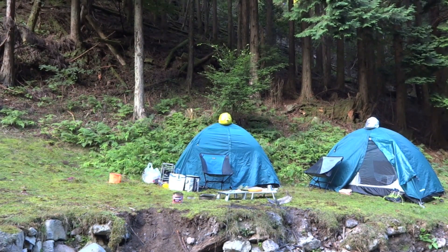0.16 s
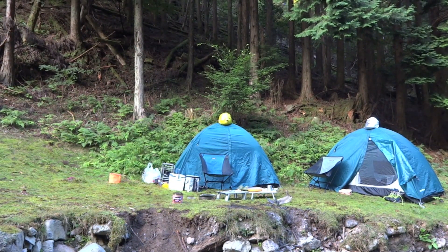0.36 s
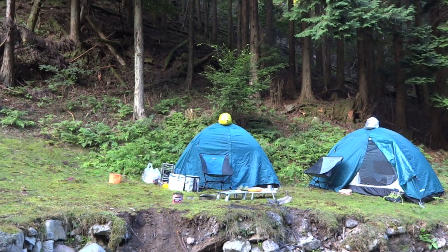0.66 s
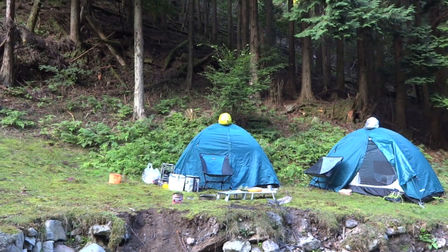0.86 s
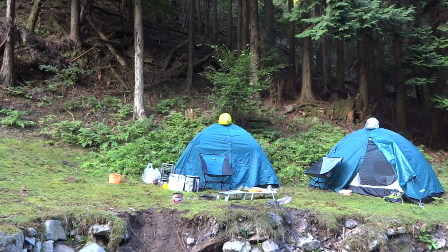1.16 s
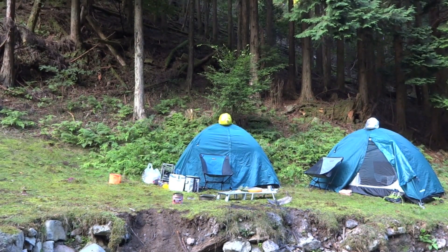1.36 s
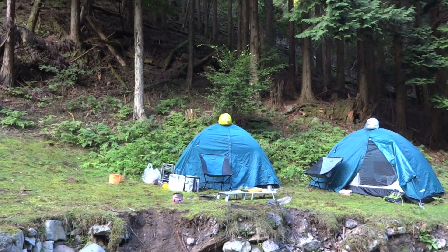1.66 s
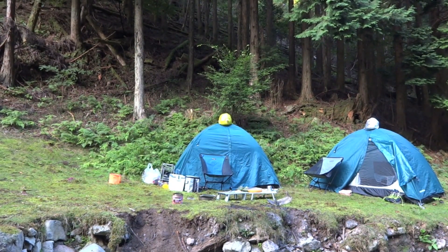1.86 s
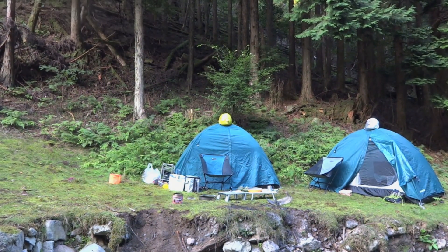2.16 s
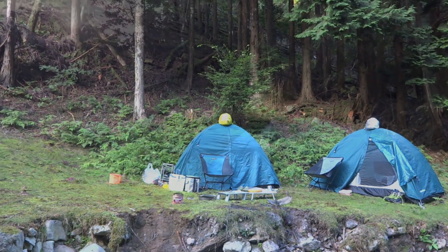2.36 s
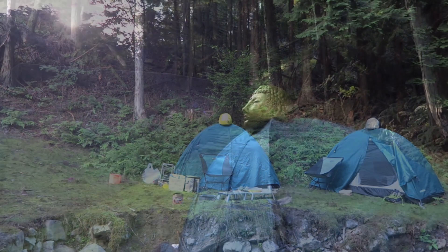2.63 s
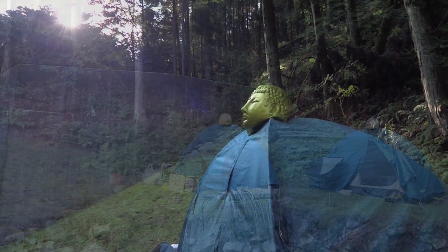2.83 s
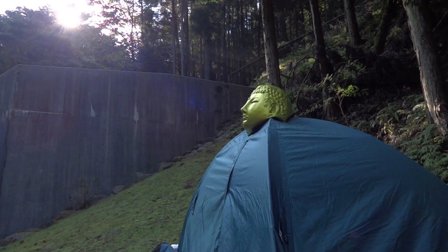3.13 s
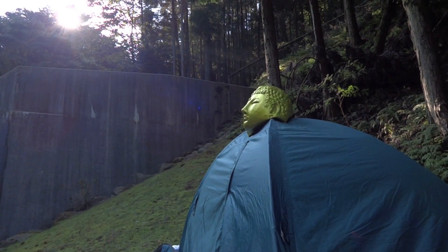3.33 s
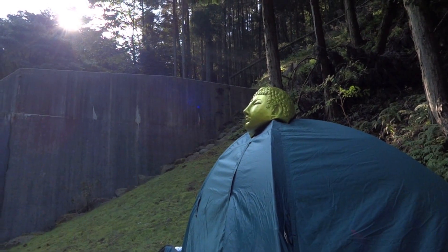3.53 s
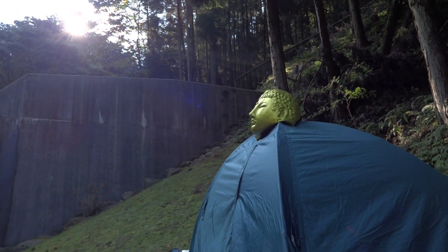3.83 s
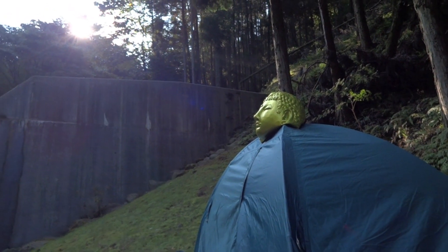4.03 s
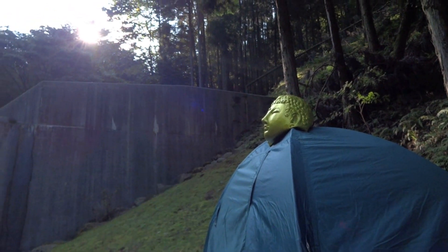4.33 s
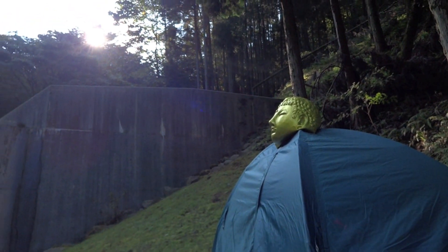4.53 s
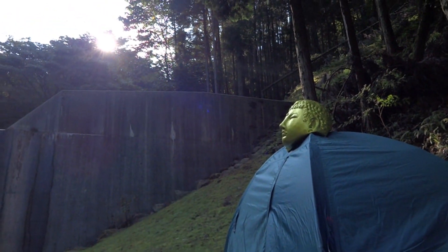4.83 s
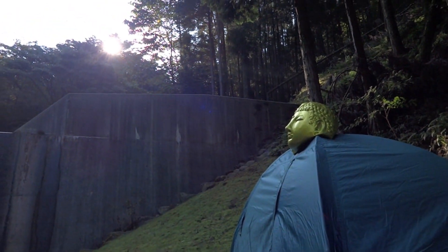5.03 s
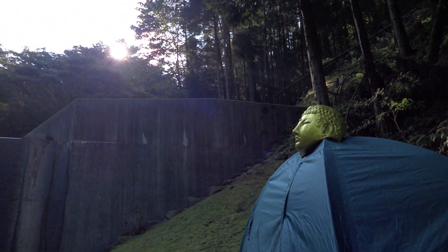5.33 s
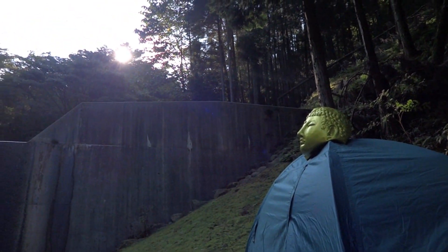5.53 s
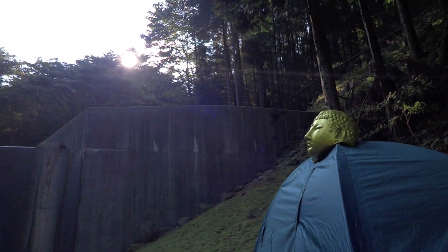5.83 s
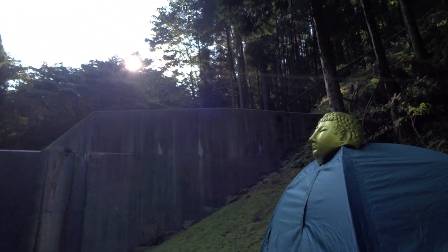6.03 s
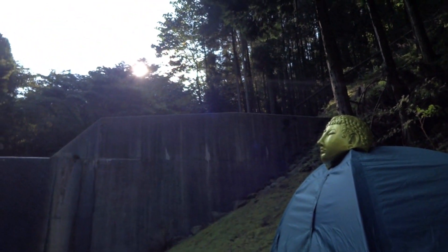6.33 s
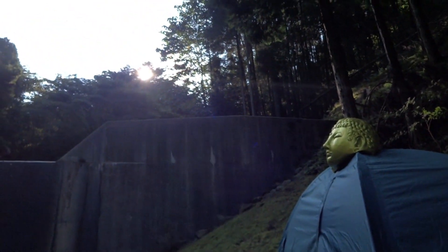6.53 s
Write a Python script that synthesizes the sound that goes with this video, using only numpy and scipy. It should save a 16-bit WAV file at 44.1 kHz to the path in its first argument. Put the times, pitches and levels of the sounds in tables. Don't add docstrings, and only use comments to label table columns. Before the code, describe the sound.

Shallow water tumbles over rocks outdoors, close and lively, with hollow bubbles, sharp drips, brief high chirps and a small rising run of low plops just before two seconds. The sound then blends smoothly into the same water at a distance, softer and flatter, with a few faint bubbles. The small stereo microphone gives little bass and leans left; the rush is continuous to the end.

```python
import sys
import numpy as np
from scipy import signal
from scipy.fft import rfft, irfft
from scipy.io import wavfile
from scipy.ndimage import uniform_filter1d

SR = 44100
rng = np.random.default_rng(int(sys.argv[2]) if len(sys.argv) > 2 else 0)


def master(y):
    cut = np.clip(np.atleast_2d(y).T, -1, 1)
    pcm = np.round(cut * 32767)
    wavfile.write(sys.argv[1], SR, pcm.astype(np.int16))


def boost(x):
    u = np.asarray(x, float) / 20
    return 10 ** u


N = 294588


def evened(x):
    return x / np.sqrt(np.mean(x ** 2) + 1e-20)


def ramp(span, t):
    return np.clip((t - span[0]) / (span[1] - span[0]), 0, 1)


def read(points, hz):
    f, *columns = np.transpose(points)
    return [np.interp(np.log(hz + 1), np.log(f + 1), column) for column in columns]


def patchwork(shape, bands, frames):
    chance = rng.standard_normal(shape)
    across = uniform_filter1d(chance, size=bands, axis=0)
    return evened(uniform_filter1d(across, size=frames, axis=1))


def bubble(hz, cycles, rise, soft):
    u = np.arange(3000) * hz / (SR * cycles)
    shape = (1 - np.exp(-u / soft)) * np.exp(-3.0 * u)
    return shape / shape.max() * np.sin(2 * np.pi * cycles * (u + rise * u ** 2 / 2))


def plops(rows, trim_db, cycles, rise, soft=0.073):
    out = np.zeros(N + 3000)
    for s, db, hz in rows:
        start = round(s * SR)
        out[start:start + 3000] += boost(db + trim_db) * bubble(hz, cycles, rise, soft)
    return out[:N]


def gurgle():
    per_s, spread_db, low_hz, high_hz, count = 900, 2.5, 452.0, 6010, 30
    out = np.zeros(N)
    bursts = rng.random(N) < per_s / SR
    strength = bursts * boost(spread_db * np.minimum(rng.exponential(1, N), 3))
    size = rng.integers(0, count, N)
    for k, hz in enumerate(np.geomspace(low_hz, high_hz, count)):
        ring = bubble(hz, cycles=26.0, rise=0.05, soft=0.58)
        ring *= np.sqrt(hz) / np.linalg.norm(ring)
        out += signal.oaconvolve(strength * (size == k), ring)[:N]
    return evened(out) * np.sqrt(2 * (high_hz - low_hz) / SR)


def place(rush, hollows, ports, level_db, bright_db, gurgles, gurgle_share, patchy_db, splash_db, lumpy_db):
    stft = {"fs": SR, "nperseg": 512, "noverlap": 384}
    hz, t, fizz = signal.stft(rng.standard_normal((2, N)), **stft)
    rings = signal.stft(gurgles, **stft)[2]
    share = gurgle_share * ((hz > 450) & (hz < 6000))[:, None]
    z = np.sqrt(1 - share) * fizz + np.sqrt(share) * rings
    shape = len(hz), len(t)
    churn_db = patchy_db * patchwork(shape, 9, 14) + splash_db * patchwork(shape, 75, 7)
    heave_db = lumpy_db * patchwork(shape, 2, 40)
    churned = np.clip(np.log2(hz / 200 + 1e-9) / 2, 0, 1)[:, None]
    tilt_db = bright_db * np.log2((hz[:, None] + 300) / 2500)
    z = z * boost(churned * churn_db + (1 - churned) * heave_db + tilt_db)
    water = rfft(signal.istft(z, **stft)[1][:, :N])

    hz = np.fft.rfftfreq(N, 1 / SR)
    colour_db = read(rush, hz)[0]
    for f, width, lift_db in hollows:
        colour_db = colour_db + lift_db / (1 + (2 * (hz - f) / width) ** 2)
    lean_db, like, lead = read(ports, hz)
    right = like * np.exp(1j * lead) * water[0] + np.sqrt(1 - like ** 2) * water[1]
    pair = irfft(boost(colour_db) * np.array([water[0], right * boost(-lean_db)]), N)
    return pair / pair.mean(0).std() * boost(level_db)


def near_bank(gurgles):
    # (frequency [Hz], level [dB per Hz])
    rush = [(30, -36), (120, -36), (220, -25), (390, -12.5), (560, -5), (820, 1.5), (1350, -2),
            (2000, -2.5), (2800, -4), (4700, -7.5), (7000, -7), (10000, -14.5), (13000, -22.5),
            (15500, -23)]
    # (frequency [Hz], width [Hz], lift [dB])
    hollows = [(846, 63, -1.5), (532, 28, 4.5), (1580, 250, 5), (2300, 400, 1), (3500, 470, 4),
               (4010, 450, 4), (5300, 380, 3), (380, 42, 5), (650, 54, -2.5), (8560, 300, 2)]
    # (frequency [Hz], left over right [dB], coherence [0-1], phase lead [rad])
    ports = [(60, 1.2, 0.27, -0.1), (400, 1.4, 0.86, 0.2), (1000, 1.8, 0.95, 0.1), (1300, 2.4, 0.71, -0.1),
             (1600, 5.5, 0.26, 0.4), (2200, 3.0, 0.86, 0.2), (2900, 5.6, 0.64, 0.3), (3800, 4.5, 0.97, 0.0),
             (4700, 5.5, 0.81, 0.1), (5500, 4.7, 0.97, 0.0), (7400, 6.9, 0.95, 0.0), (8500, 5.4, 0.84, 0.0),
             (11000, 4.6, 0.38, 0.2), (13500, 1.0, 0.55, 0.0)]
    return place(rush, hollows, ports, -36.5, 0.33, gurgles, gurgle_share=0.14,
                 patchy_db=0.3, splash_db=1.04, lumpy_db=2.0)


def hollow_bubbles():
    # (time [s], peak level [dB], pitch [Hz])
    lingering = [(0.002, -31, 847), (0.04, -45, 830), (0.335, -38, 880), (0.36, -41, 870),
                 (0.029, -37, 1020), (0.184, -35.5, 800), (0.29, -30.5, 795), (0.451, -33, 830),
                 (1.773, -30, 876), (2.91, -40, 860), (3.184, -33.5, 846), (3.234, -41, 880),
                 (4.097, -39, 875), (4.088, -46, 876), (4.15, -42, 890), (4.165, -45, 890),
                 (4.118, -38, 850), (4.132, -38, 860), (4.205, -38, 914), (5.549, -41, 845)]
    quick = [(0.057, -39, 950), (0.097, -39, 950), (0.122, -29, 980), (1.565, -29, 960), (1.63, -33, 870),
             (1.96, -29, 910), (2.083, -35, 970), (4.212, -39, 1160), (0.165, -30.5, 820),
             (0.332, -37, 865), (0.609, -33, 840), (0.622, -27.5, 806), (0.705, -30, 920), (0.73, -40, 950),
             (3.862, -44, 870), (0.681, -32, 940), (0.984, -37, 795), (1.029, -32, 1090), (1.073, -34, 980),
             (1.141, -28, 1110), (1.193, -40, 1000), (1.887, -33, 930), (1.949, -29, 936),
             (2.049, -34, 1000), (3.654, -39, 825), (3.935, -39, 840), (4.241, -36, 1130),
             (4.974, -36, 840), (5.048, -36, 875), (5.483, -40, 1110), (6.058, -39, 1180),
             (6.556, -36, 1140), (6.655, -36, 1250)]
    return plops(lingering, -4.5, cycles=25, rise=0.11) + plops(quick, -3.1, cycles=12, rise=0.056)


def surges(t):
    # (time [s], lift [dB], swell [s])
    crests = [(0.08, -1, .06), (0.49, 1, 0.056), (0.75, 0.5, 0.12), (1.15, 0, .1), (1.57, -1.5, .08),
              (1.78, -1.5, .1), (1.96, 0, 0.074), (2.045, 0, 0.024), (2.11, 1, 0.02), (2.45, -0.5, .06),
              (0.04, 0.5, 0.031), (3.65, -0.8, .2), (5.46, 0, .05), (3.24, 0.5, 0.042), (4.25, 1, .1),
              (5.64, 0.6, .06), (5.96, 0.5, .2), (6.1, 1, 0.1), (6.56, 0.3, 0.41)]
    break_s = 0.044
    lift_db = np.zeros(len(t))
    for s, db, swell in crests:
        lift_db += db * np.interp(t, [s - swell, s, s + break_s], [0, 1, 0])
    return lift_db


def small_bubbles():
    # (time [s], peak level [dB], pitch [Hz])
    smallest = [(0.0353, -8, 3500), (0.045, -7, 3600), (0.0742, -18, 3280), (0.8011, -12, 3420),
                (0.9298, -7, 3240), (1.259, -6.5, 3800), (1.158, -17, 3540), (1.325, -21, 3930),
                (1.617, -16, 4000), (1.975, -16, 4000), (0.484, -13, 3500), (1.8757, -26, 3000),
                (2.3245, -5.5, 3630), (2.435, -16, 4020), (2.52, -24, 3800), (2.61, -26, 3830),
                (2.68, -18, 3800), (5.6291, -12, 3000), (6.5794, -17, 3140)]
    middling = [(0.0838, -22.5, 2250), (0.0938, -29, 2570), (0.2229, -26.5, 2030), (0.4823, -21.5, 2300),
                (1.0914, -28, 1900), (1.1268, -32, 1660), (1.1438, -35, 1405), (1.158, -33, 1470),
                (0.372, -32, 1840), (0.468, -36, 1380), (1.265, -30, 2230), (1.502, -28, 1640),
                (1.645, -33, 2080), (2.262, -31, 2220), (3.312, -39, 1250), (3.353, -43, 2300),
                (4.168, -34, 1660), (1.9584, -30, 1646), (3.271, -48, 1650), (5.2142, -34, 1300),
                (5.6294, -39, 2300)]
    return plops(smallest, -26, cycles=36, rise=0.025) + plops(middling, -6, cycles=27.5, rise=0.02)


def stray_bubbles():
    # (time [s], peak level [dB], pitch [Hz])
    strays = [(0.0483, -39, 2870.0), (0.1898, -35, 4830), (0.6753, -36, 2440), (0.8331, -42, 3200),
              (1.346, -40, 2730.0), (1.7795, -43, 1040), (2.0799, -39, 2380), (2.3304, -46, 754),
              (2.3688, -40, 1710), (2.3855, -41, 4090.0), (2.8473, -49, 5000.0), (4.5027, -44, 4500),
              (4.5176, -43, 1730.0), (5.8987, -47, 1050.0), (5.9562, -47, 2600.0), (6.3915, -41, 4800)]
    return plops(strays, 1.3, cycles=22, rise=0.034, soft=0.23)


def splashes():
    # (time [s], peak level [dB], middle pitch [Hz], length [s])
    knots = [(0.077, -20, 3000, 0.02), (0.486, -35, 3400, .006), (0.803, -15, 3300, .006),
             (0.934, -22, 3280, .006), (1.083, -23, 1400, .028), (1.134, -23, 1390, .02),
             (1.206, -21, 1100, .006), (1.946, -29, 1140, 0.014), (2.077, -18.5, 2830, 0.0073),
             (2.116, -26, 2600, 0.005), (3.255, -28, 2500, 0.0051), (4.966, -40, 1090, 0.005),
             (5.632, -36, 2800, 0.0064), (2.332, -20, 6600, .01), (0.981, -25, 784, .004),
             (2.116, -22, 8500, .012), (5.455, -26, 7500, 0.017), (0.084, -24, 5400, .008),
             (0.47, -26, 9000, .02), (1.128, -24, 1500, 0.011)]
    count, spread_octaves = 8, 0.93
    rows = []
    for s, db, hz, length in knots:
        for k in range(count):
            late, size = rng.random(2)
            octaves = spread_octaves * ((k + size) / count - .55)
            rows.append((s + length * late ** 2, db, hz * 2 ** octaves))
    return plops(rows, -15.5, cycles=7.1, rise=0.036)


def climbing_bubbles():
    # (time [s], peak level [dB], starting pitch [Hz])
    climbers = [
        (1.4, -39, 3700),
        (1.384, -30.5, 2070),
        (1.452, -33, 3380),
        (1.2, -39, 3580),
        (1.47, -34, 3820),
        (1.8, -40, 3400),
        (0.078, -41, 3500),
        (1.326, -41, 3950),
        (0.0845, -36, 2150),
        (5.629, -47, 3010),
    ]
    return plops(climbers, -2.4, cycles=51, rise=0.13)


def glugs():
    # (time [s], peak level [dB], pitch [Hz])
    pockets = [(0.0816, -47, 532), (1.0861, -41, 650.0), (1.2916, -56, 336), (1.8808, -66, 251),
               (1.9162, -53, 650.0), (1.9839, -50, 400.0), (2.3328, -54, 700.0), (2.6733, -59, 500.0),
               (2.7252, -58, 380.0), (2.8536, -65, 306), (3.2764, -58, 650.0), (3.4545, -75, 250.0),
               (3.579, -58, 290.0), (3.8293, -60.5, 333), (3.9381, -67, 500.0), (4.2829, -58, 460.0),
               (4.4075, -66, 345), (4.9, -62, 289), (4.9668, -52, 715), (5.2819, -62, 570.0),
               (6.0708, -55, 575), (6.4352, -65, 330.0), (6.4953, -63, 383), (6.6141, -65, 470)]
    return plops(pockets, 1.3, cycles=19, rise=0.027, soft=.3)


def smacks():
    # (time [s], peak level [dB], pitch [Hz])
    drops = [(0.0943, -33, 2510.0), (0.3294, -32, 6000.0), (0.4658, -32, 1230.0), (0.473, -39, 1440.0),
             (0.6485, -31, 2710.0), (0.8229, -31, 5540.0), (0.9224, -28, 4370.0), (0.9854, -40, 690),
             (1.1471, -28, 1220), (1.9174, -46, 650.0), (1.9578, -29, 820.0), (2.0035, -22, 6000.0),
             (2.0804, -37, 2710.0), (2.1184, -29, 2510.0), (2.3313, -32, 3440.0), (2.3874, -34, 3730.0),
             (2.4065, -36, 5120.0), (2.5381, -34, 3180.0), (2.8464, -37, 5540.0), (2.888, -30.5, 1760),
             (3.2534, -39, 2970), (3.6929, -40, 3180.0), (4.1025, -52, 890.0), (4.2047, -33, 970.0),
             (4.2716, -40, 6000.0), (4.6373, -33, 1820.0), (4.981, -35, 2310.0), (5.3324, -48, 600.0),
             (5.4831, -42, 1050.0), (6.0585, -44, 970.0), (6.2933, -40, 2510.0),
             (3.2706, -30, 1600), (3.6, -33, 1700), (1.9595, -29, 1750), (1.1428, -36, 920),
                  (0.62, -28, 1900), (0.1, -30, 3400), (2.9, -40, 980), (1, -31, 930), (2.1, -33, 3300),
                  (3.6520, -35, 1040), (4.1, -37, 1180), (0.0858, -32, 2200)]
    return plops(drops, 0.56, cycles=3.8, rise=0.055, soft=0.25)


def deep_plops():
    # (time [s], peak level [dB], pitch [Hz])
    deep = [
        (1.711, -41, 514),
        (1.859, -43, 466),
        (1.885, -43, 527),
        (1.912, -37.5, 613),
        (1.93, -42, 674),
        (1.942, -38, 784),
        (1.989, -41, 620),
        (2.223, -39, 620),
    ]
    return plops(deep, -2.7, cycles=26, rise=0.05)


def far_wall(gurgles):
    # (frequency [Hz], level [dB per Hz])
    rush = [(30, -45), (120, -41.5), (220, -30.5), (390, -16), (600, -14.5), (1000, -13.5), (1400, -12.5),
            (2300, -11), (3400, -15.5), (5000, -19), (6600, -17.5), (10000, -21.5), (13000, -29.5),
            (15500, -35)]
    # (frequency [Hz], width [Hz], lift [dB])
    hollows = [(353, 53, -2.5), (840, 213, 6), (1250, 153, 5.5), (1617, 350, 9.5), (1965, 250, 5.5),
               (500, 205, -5.5), (3080, 330, 2), (4310, 840, 4.5), (6360, 880, 1)]
    # (frequency [Hz], left over right [dB], coherence [0-1], phase lead [rad])
    ports = [(60, 0.6, 0.12, -0.1), (350, 2.7, 0.46, 0.3), (500, 1.9, 0.19, 1.7), (850, 3.6, 0.85, 0.3),
             (1200, 1.5, 0.79, -0.4), (1400, 3.8, 0.37, -2.2), (1600, 8.1, 0.64, -3.4),
             (2050, 6.0, 0.64, -4.2), (2300, 3.8, 0.8, -5.9), (3000, 3.0, 0.9, -6.3),
             (3900, 3.8, 0.86, -6.2), (4500, 2.8, 0.98, -6.3), (9000, 3.9, 0.99, -6.3),
             (14500, 1.5, 0.88, -6.3)]
    return place(rush, hollows, ports, -43.5, 0.01, gurgles, gurgle_share=0.093,
                 patchy_db=0.66, splash_db=0.29, lumpy_db=4.0)


def sliding_bubble():
    # (time [s], peak level [dB], starting pitch [Hz])
    slide = [
        (1.902, -42.5, 591),
    ]
    return plops(slide, .3, cycles=54, rise=.75, soft=.9)


def scene():
    t = np.arange(N) / SR
    a, b = gurgle(), gurgle()
    near = near_bank([b, a])
    far = far_wall([a, b])
    water = (1 - ramp((2.02, 3.265), t)) * near + ramp((1.78, 3.32), t) * far
    single = hollow_bubbles() + small_bubbles() + stray_bubbles() + splashes() + climbing_bubbles()
    single += glugs() + smacks() + deep_plops() + sliding_bubble()
    bass_cut = signal.butter(4, 330, "high", fs=SR, output="sos")
    single = signal.sosfilt(bass_cut, single)
    return boost(surges(t)) * water + single * boost(np.array([[1.5], [-1.5]]))


def roll_off(x):
    return signal.sosfilt(signal.butter(12, 15640, fs=SR, output="sos"), x)


def record(dry):
    mix = boost(.35) * dry
    return roll_off(mix)


dry = scene()
out = record(dry)
master(out)
```